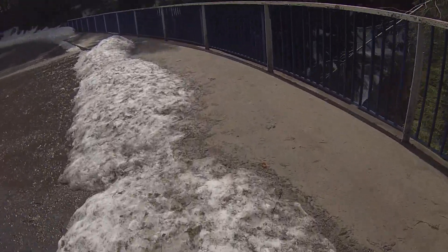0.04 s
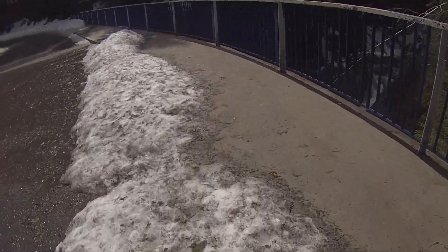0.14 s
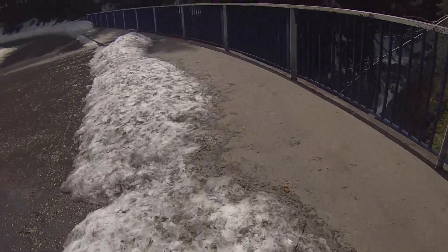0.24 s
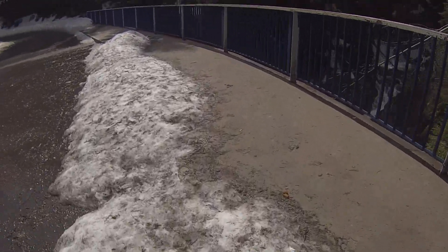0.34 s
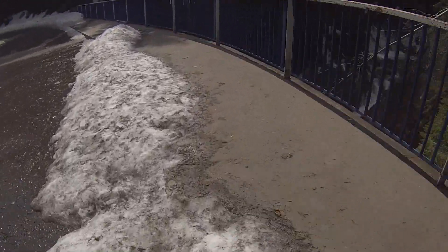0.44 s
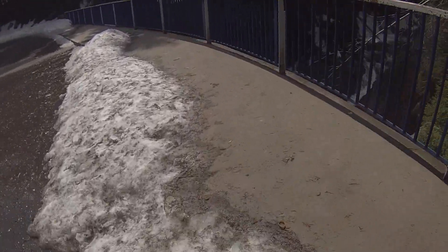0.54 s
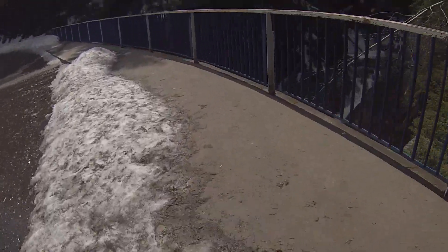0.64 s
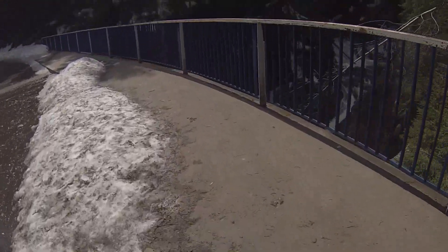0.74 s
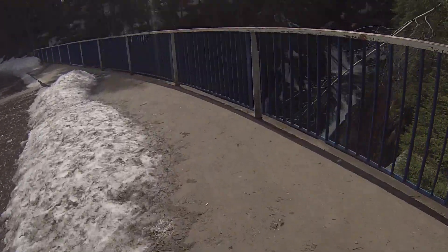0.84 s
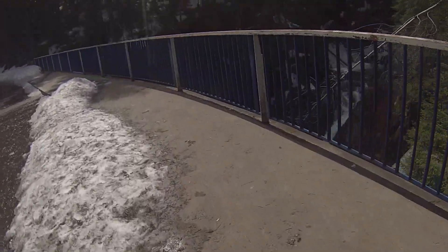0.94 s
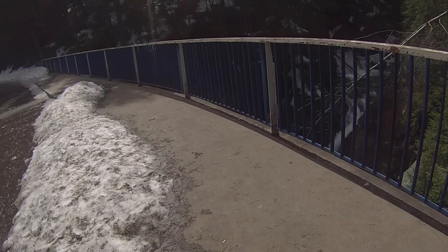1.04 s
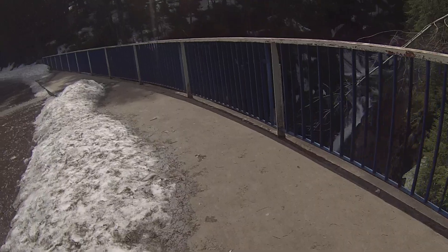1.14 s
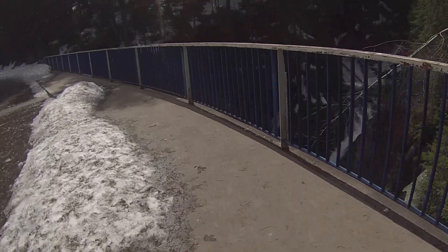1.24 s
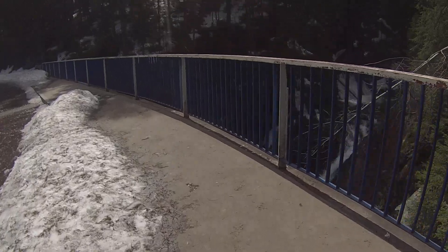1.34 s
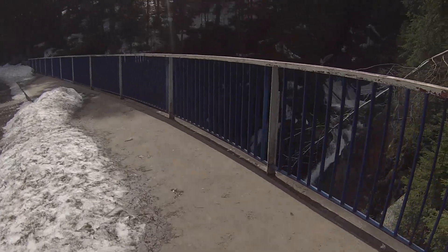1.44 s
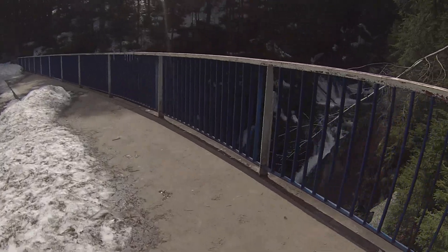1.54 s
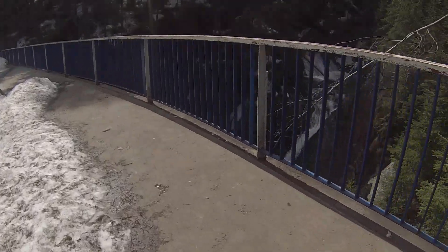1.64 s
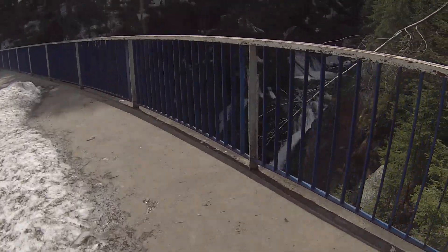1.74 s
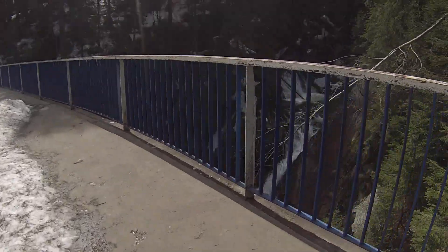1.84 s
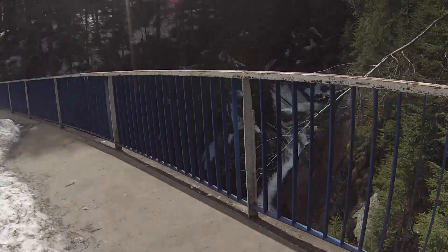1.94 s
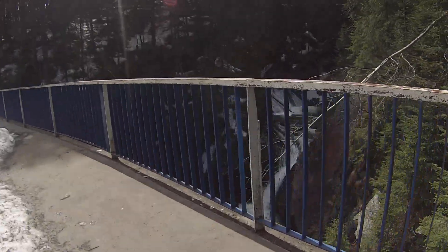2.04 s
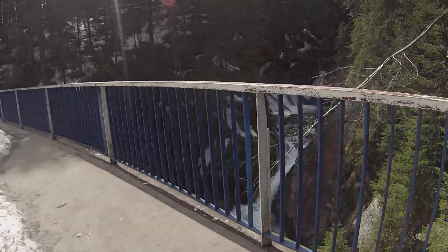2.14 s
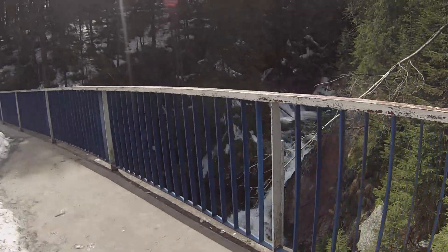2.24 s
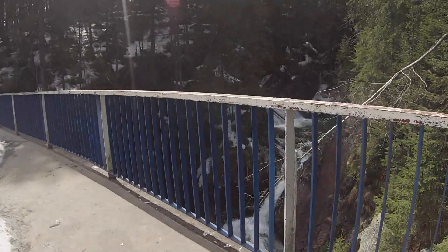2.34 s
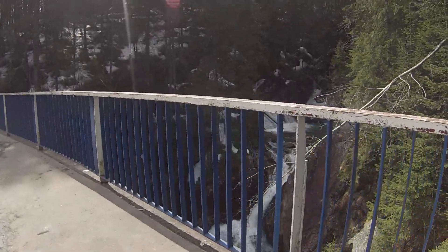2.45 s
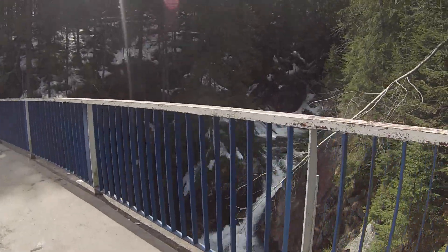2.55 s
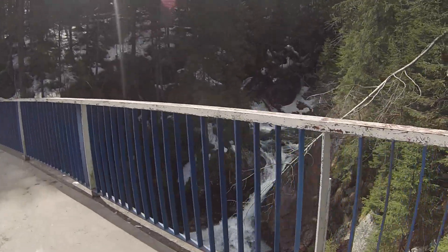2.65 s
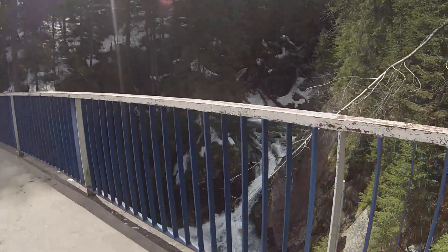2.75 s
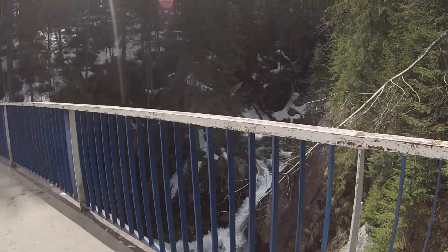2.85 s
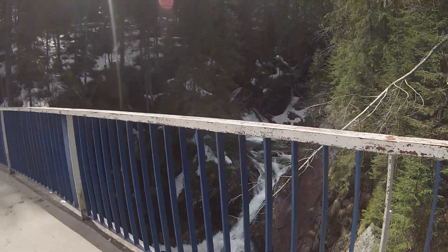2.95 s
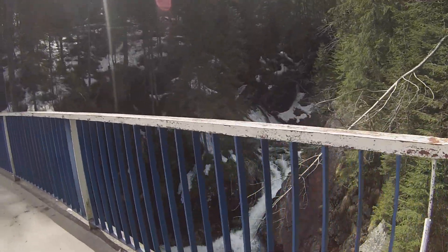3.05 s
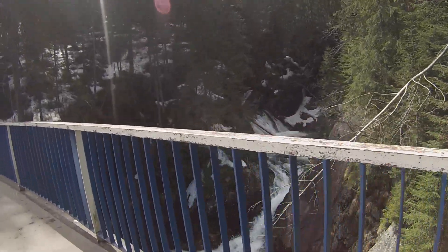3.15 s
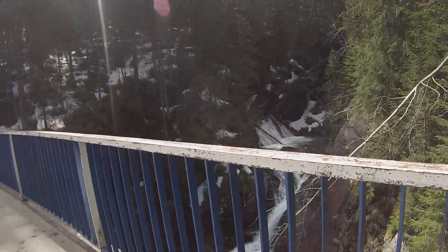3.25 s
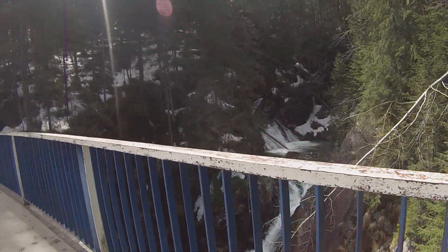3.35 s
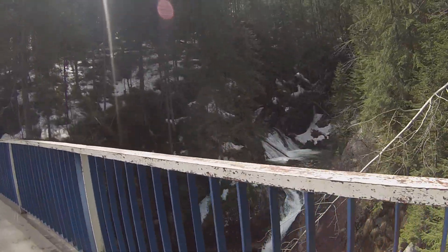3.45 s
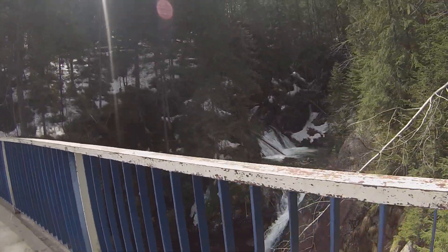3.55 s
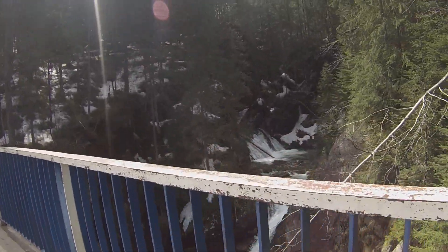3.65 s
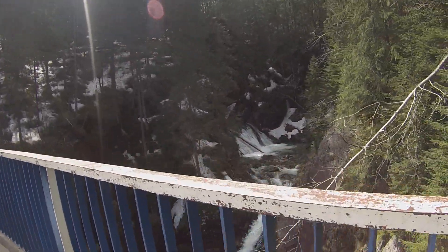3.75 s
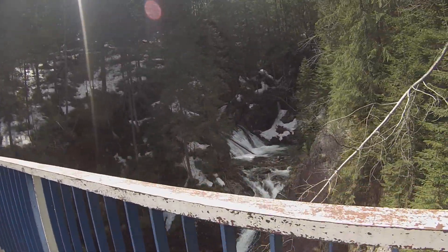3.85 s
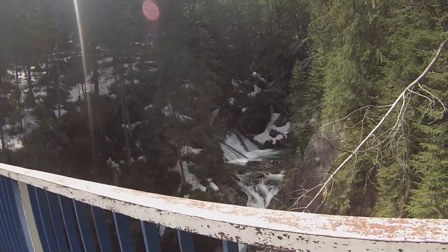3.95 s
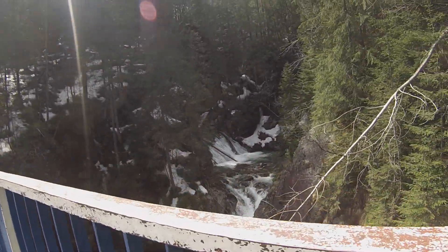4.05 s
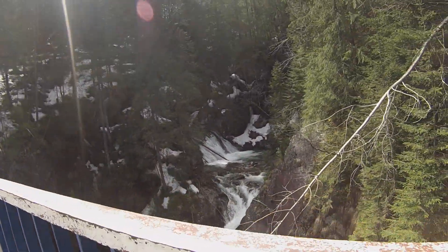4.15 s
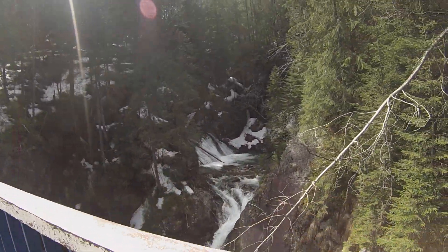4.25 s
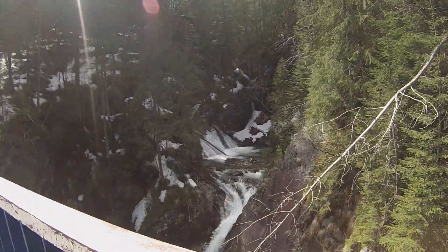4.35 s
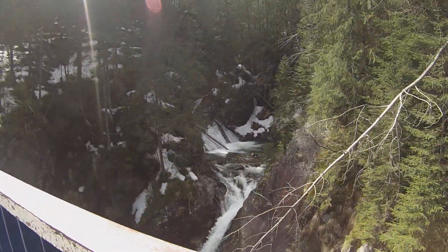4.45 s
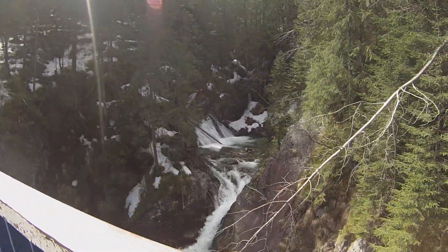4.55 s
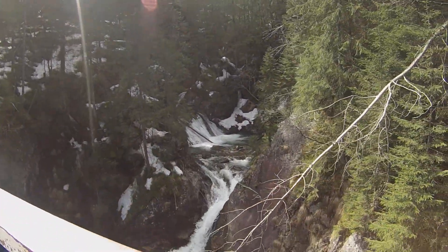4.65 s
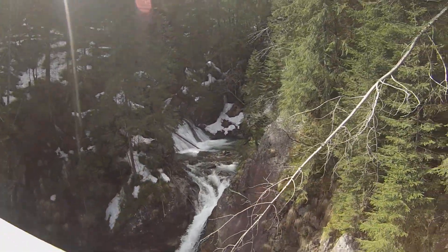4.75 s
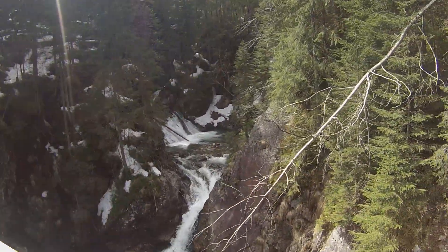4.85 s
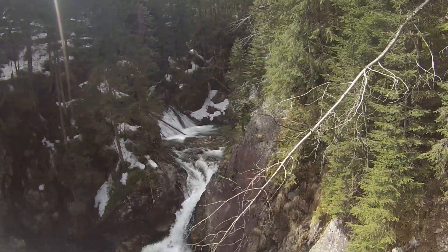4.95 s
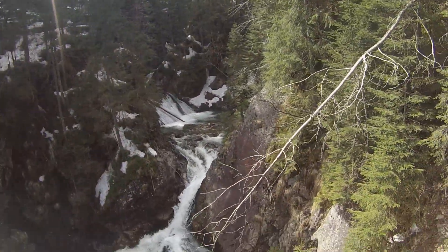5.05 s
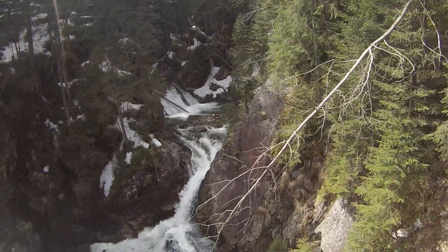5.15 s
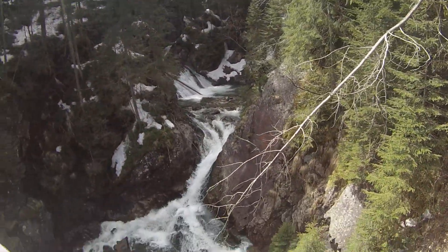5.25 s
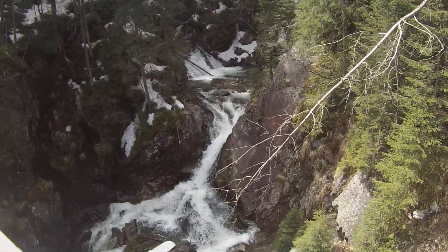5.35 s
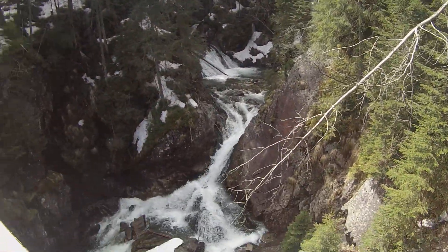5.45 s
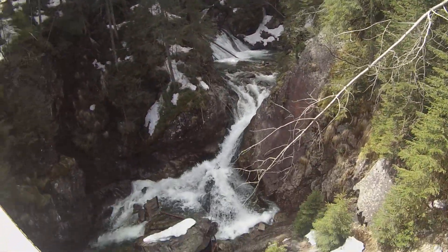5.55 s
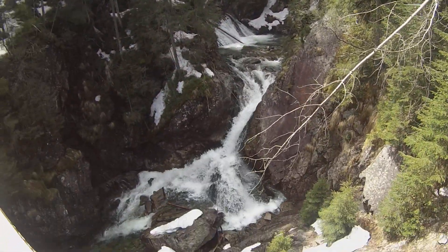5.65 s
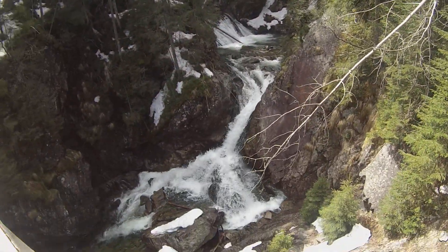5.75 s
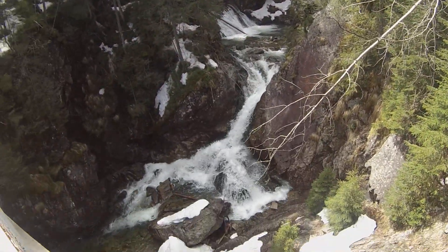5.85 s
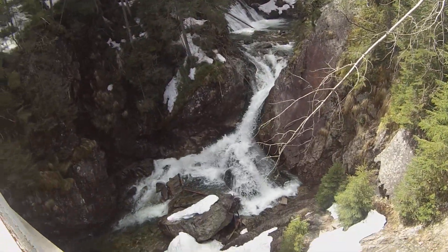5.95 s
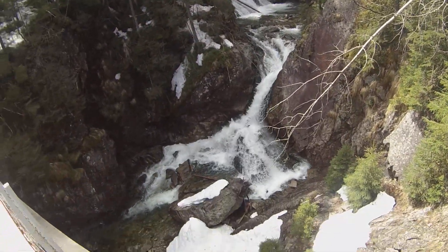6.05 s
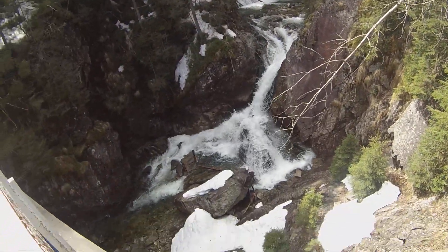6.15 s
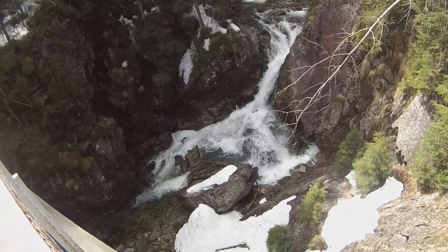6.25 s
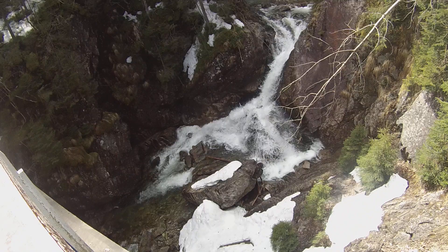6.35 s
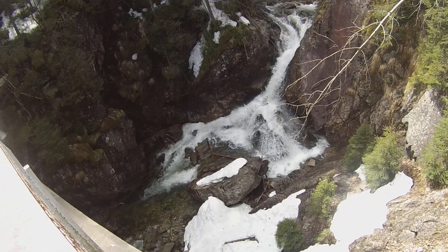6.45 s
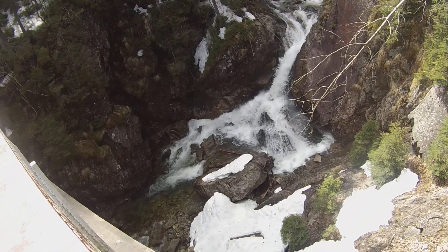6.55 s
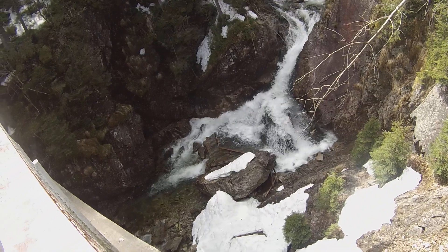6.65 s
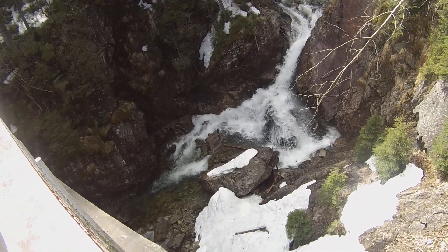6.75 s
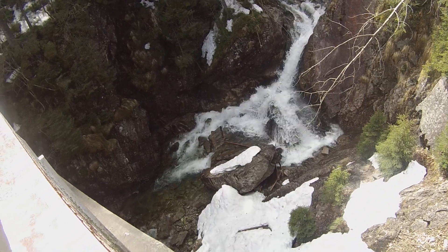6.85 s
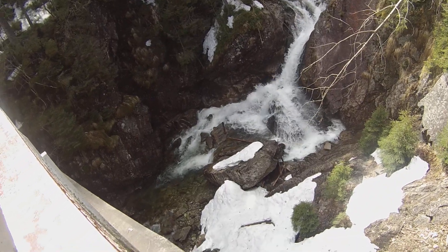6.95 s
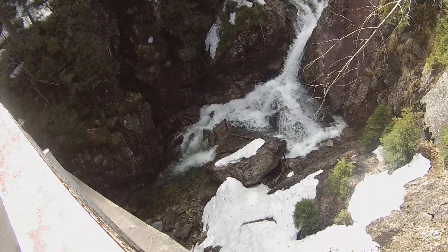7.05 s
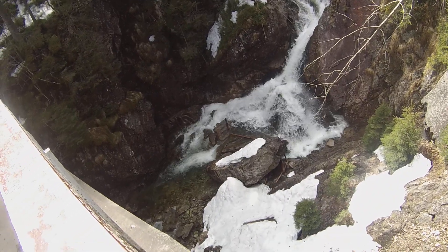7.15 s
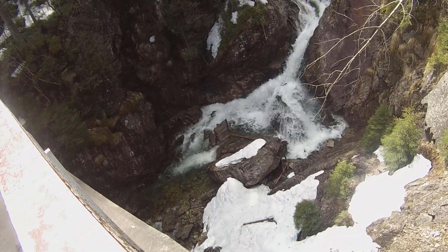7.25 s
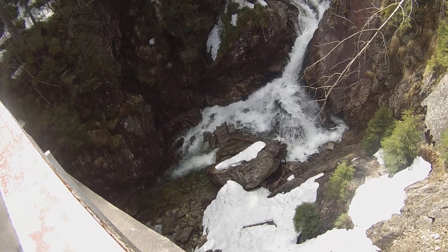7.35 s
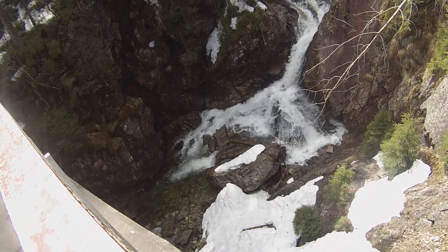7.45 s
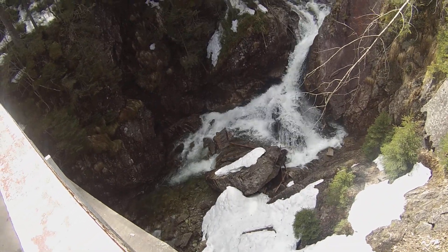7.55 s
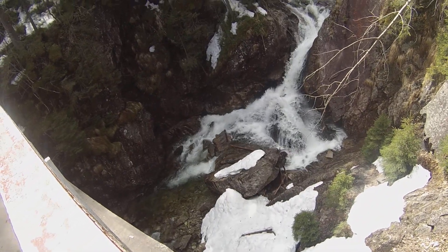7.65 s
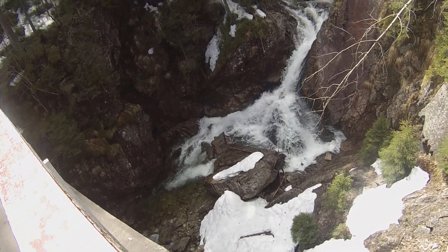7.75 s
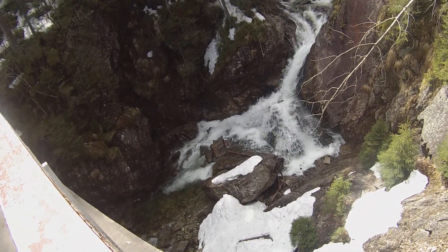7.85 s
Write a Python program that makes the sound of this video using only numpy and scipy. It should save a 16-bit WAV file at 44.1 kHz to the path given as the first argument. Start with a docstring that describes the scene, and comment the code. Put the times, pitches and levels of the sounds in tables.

```python
"""A waterfall rushes in a forested gorge: countless splashes sum to broadband noise.
It is heard from a bridge by a hand-held camera in a plastic case. As the camera is carried to the
railing and tipped down, the water leaves the acoustic shadow of the deck and grows louder and brighter,
while the case colours it differently for each direction. Eddies of air rumble on the microphone port;
fingers click, rub and bump on the case, exciting its resonances, and the plastic squeaks once."""
import sys
import numpy as np
from scipy import signal
from scipy.fft import rfft, irfft, next_fast_len
from scipy.io import wavfile
from scipy.ndimage import uniform_filter1d, map_coordinates

SR = 44100
rng = np.random.default_rng(int(sys.argv[2]) if len(sys.argv) > 2 else 0)


def master(y):
    """Save y as 16-bit WAV."""
    cut = np.clip(np.atleast_2d(y).T, -1, 1)
    pcm = np.round(cut * 32767)  # scale
    wavfile.write(sys.argv[1], SR, pcm.astype(np.int16))


N = 348390

# Falling water. Each row: frequency in Hz, relative spectral density in dB.
WATER_SPECTRUM = [(40, 5), (100, 0), (170, -2), (330, -2.5), (800, -12), (1500, -9.5), (3200, -4),
                  (6000, -15.5), (9000, -18), (13000, -26), (15300, -34.5)]
# Peaks and notches of the case for outside sound. Each row: centre in Hz, width in Hz,
# then gain in dB on the walkway, at the railing and facing the fall.
PORT_COLOURS = [(670, 79, -0.5, -5.5, -2), (894, 134, 5.5, 6, 0.5), (1320, 263, 8, 8.5, -5),
                (1570, 64, 5.5, -0.5, 10.5), (2050, 120, 1, -4.5, 5), (2370, 256, -0.6, 6.5, -2),
                (2905, 124, 1.5, 4.5, 0), (3410, 162, 5, 3, 9), (4236, 37, -2, -0.5, 8),
                (4560, 170, 3, 10, -5.5), (4760, 160, -5, -2.5, -7), (5330, 230, 3, 8, 5),
                (6240, 400, 4, 7, 6), (7650, 230, -2, 1, -8), (8250, 720, 4.5, 4, 8.5),
                (11900, 225, -0.9, 5.5, -1)]
# The camera's path. Each row: time in seconds, place (0 walkway, 1 railing, 2 facing the fall),
# open view of the water from 0 to 1.
CAMERA_PATH = [(0, .07, 0.031), (1.5, .2, 0.28), (2.7, 0.64, .42), (3.4, 0.72, 0.57), (3.75, 1.1, 0.74),
               (4.5, 1.17, 0.7), (5.5, 1.63, 1), (7.9, 1.74, 1)]
# Eddies on the port. Each row: frequency in Hz, relative spectral density in dB.
EDDY_SPECTRUM = [(5, -46), (12, -0.5), (25, -2), (40, -12), (60, -13.5), (100, -34), (200, -39), (500, -83),
                 (1000, -120)]
# The breeze on the port. Each row: time in seconds, level in dB.
BREEZE_LEVELS = [(0, -53), (.3, -42), (.95, -43.5), (1.6, -37), (2.22, -45.5), (2.7, -42.5), (3.4, -47.5),
                 (3.9, -49), (4.15, -44), (4.8, -39.5), (5.6, -41.5), (6.6, -50), (7.9, -53.5)]
# Single puffs of air. Each row: time of the peak in seconds, level in dB.
AIR_PUFFS = [(.17, -46), (.6, -31.5), (2.02, -37), (2.53, -33), (6.09, -31.5)]
# Resonances of the touched case. Each row: frequency in Hz, bandwidth in Hz, gain in dB.
CASE_MODES = [(537, 39, -22), (820, 235, 3), (1090, 153, 4.5), (1575, 440, 5), (1865, 14, -16),
              (2120, 67, -2.5), (3000, 320, 3), (3464, 135, 0), (4590, 83, -8), (5600, 470, -6.5),
              (8180, 310, -9.5), (8760, 290, -13), (12000, 390, -25), (14500, 830, -37)]
# Hard clicks. Each row: start in seconds, peak level in dB, upper and lower edges of the
# force spectrum in Hz, rattle of the mount in dB relative to the blow.
HARD_CLICKS = [(0.528, -45, 4970, 600, -24), (2.7322, -5.5, 12000, 646, -38.5),
               (4.667, -12.5, 4030, 785, -34.5), (5.0133, -16.5, 635, 323, -31)]
# Sliding fingers. Each row: start in seconds, length in seconds, scrape level in dB,
# upper edge of the force spectrum in Hz.
FINGER_STROKES = [(1.428, 0.1, -76, 2500), (3.576, 0.21, -58, 1840), (4.616, 0.095, -56, 1700),
                  (4.687, 0.066, -43, 2500), (4.731, 0.12, -49, 1700), (4.926, 0.076, -40, 4300),
                  (5.01, 0.055, -46, 1500), (5.249, 0.5, -57, 1800)]
# Dry skin hissing on plastic. Each row: frequency in Hz, relative spectral density in dB.
SKIN_SPECTRUM = [(500, -30), (2000, 2), (4500, 1.5), (8000, -1), (12000, -8), (15000, -16)]
# The wall shuddering under a finger. Each row: frequency in Hz, relative spectral density in dB.
SHUDDER_SPECTRUM = [(20, -9), (80, 1), (130, -9.5), (300, -17.5), (700, -19), (2000, -70)]
# Fingertips landing as the grip changes. Each row: start in seconds, push peak in dB, tick peak in dB.
FINGER_PRESSES = [(4.2, -32.5, -52), (4.299, -31, -44), (4.4034, -37.5, -34.5), (4.5957, -29, -34.5),
                  (4.635, -40, -32), (4.698, -27.5, -31), (4.7646, -28.5, -39), (4.968, -27, -37),
                  (5.119, -30, -39), (5.263, -34, -38), (5.72, -33, -43), (5.785, -32, -54),
                  (5.954, -33, -54), (6.336, -26, -43), (6.493, -35, -51)]


def amp(db):
    """Amplitude ratio of a level in decibels."""
    return 10 ** (np.asarray(db) / 20)


def unit(x):
    """The signal normalised to rms 1."""
    return x / np.sqrt(np.mean(x ** 2) + 1e-20)


def curves(rows):
    """Linear interpolation in time: one value per sample for each column after the first."""
    times, *columns = np.transpose(rows)
    return [np.interp(np.arange(N) / SR, times, column) for column in columns]


def wobble(rate):
    """Smooth random modulation: a spline through `rate` Gaussian values a second."""
    return map_coordinates(rng.standard_normal(int(N * rate / SR) + 4), [np.arange(N) * rate / SR])


def filtered(x, response):
    """Linear filtering: the spectrum is multiplied by a frequency response."""
    size = next_fast_len(len(x) + SR // 4)
    return irfft(rfft(x, size) * response(np.fft.rfftfreq(size, 1 / SR)), size)[:len(x)]


def shaped(x, spectrum):
    """Spectral shaping by (Hz, dB) points joined on a logarithmic frequency axis."""
    points_hz, db = np.transpose(spectrum)
    return filtered(x, lambda hz: amp(np.interp(np.log(hz + 1), np.log(points_hz + 1), db)))


def add(track, start, sound):
    """Superposition: a sound joins the track at `start` seconds."""
    part = track[round(start * SR):][:len(sound)]
    part += sound[:len(part)]


def churn(depth_db):
    """Splashes in a torrent modulate noise in brief, random patches of time and frequency."""
    spectrogram = signal.stft(rng.standard_normal(N), nperseg=512)[2]
    patches = uniform_filter1d(rng.standard_normal(spectrogram.shape), size=6, axis=0)
    patches = uniform_filter1d(patches, size=12, axis=1)
    return unit(signal.istft(spectrogram * amp(depth_db * unit(patches)), nperseg=512)[1][:N])


def through_port(x):
    """The response of the case depends on direction, so three colourings crossfade along the path."""
    place, _ = curves(CAMERA_PATH)
    heard = np.zeros(N)
    for k in range(3):
        colour = lambda hz: amp(sum(db[k] * np.exp(-.5 * ((hz - centre) / width) ** 2)
                                    for centre, width, *db in PORT_COLOURS))
        nearness = np.maximum(1 - abs(place - k), 0)
        heard += nearness * filtered(x, colour)
    return heard


def waterfall(pool_hz=650, spray_hz=5000):
    """Pool, chute and spray radiate noise; the deck's acoustic shadow weakens the high bands most."""
    _, view = curves(CAMERA_PATH)
    shadow = 1 - view
    water = through_port(shaped(churn(depth_db=1.0), WATER_SPECTRUM))
    below = lambda hz, edge_hz: 1 / (1 + (hz / edge_hz) ** 8)
    pool = unit(filtered(water, lambda hz: below(hz, pool_hz)))
    chute = unit(filtered(water, lambda hz: below(hz, spray_hz) - below(hz, pool_hz)))
    spray = unit(filtered(water, lambda hz: 1 - below(hz, spray_hz)))
    # Each band in dB: its level in full view, less the shadow, plus a slight surge of its own.
    return (pool * amp(-52 - 7.5 * shadow + 0.29 * wobble(rate=9))
            + chute * amp(-48.5 - 9 * shadow + 0.23 * wobble(rate=24))
            + spray * amp(-57 - 10 * shadow + 0.22 * wobble(rate=4.9)))


def wind(flutter_db=1.6, puff_sigma_s=0.021):
    """Turbulent pressure rumbles on the port; a fluttering breeze and brief puffs add in power."""
    t = np.arange(N) / SR
    breeze_db, = curves(BREEZE_LEVELS)
    puffs = sum(amp(db) * np.exp(-.5 * ((t - peak_s) / puff_sigma_s) ** 2) for peak_s, db in AIR_PUFFS)
    eddies = shaped(rng.standard_normal(N), EDDY_SPECTRUM)
    running_rms = np.sqrt(abs(uniform_filter1d(eddies ** 2, size=SR // 5)))
    breeze = amp(breeze_db + flutter_db * wobble(rate=11))
    return np.hypot(breeze, puffs) * eddies / running_rms


def squeak(start_s=0.521, length_s=0.015, start_hz=3020, end_hz=3170, db=-47.5):
    """Friction of plastic shifting in the grip gives one tiny rising tone."""
    track = np.zeros(N)
    progress = np.linspace(0, 1, round(length_s * SR))
    phase = 2 * np.pi * np.cumsum(start_hz + (end_hz - start_hz) * progress) / SR
    add(track, start_s, amp(db) * np.sin(np.pi * progress) * np.sin(phase))
    return track


def case_ring(force, upper_hz):
    """A force drives the damped modes of the case; a softer contact leaves out the high ones."""
    modes = lambda hz: sum((-1) ** k * amp(db) * 1j * hz * width
                           / (centre ** 2 - hz ** 2 + 1j * hz * width)
                           for k, (centre, width, db) in enumerate(CASE_MODES))
    contact = signal.butter(3, upper_hz, fs=SR, output="sos")
    return filtered(signal.sosfilt(contact, force), modes)


def tap(upper_hz, lower_hz, rattle_db, rattle_t60=0.056):
    """Impulse response of the case, with a faint decaying rattle in its mount, scaled to peak 1."""
    t = np.arange(SR // 10) / SR
    rattle = amp(rattle_db - 60 * t / rattle_t60) * rng.standard_normal(len(t))
    force = (t == 0) + rattle
    # A tap near a stiff corner barely moves the low modes.
    stiffness = signal.butter(4, lower_hz, "highpass", fs=SR, output="sos")
    ring = case_ring(signal.sosfilt(stiffness, force), upper_hz)
    return ring / abs(ring).max()


def push(length_s):
    """The elastic wall yields and springs back: one pressure swing of peak 1, too damped to ring."""
    u = 2 * np.arange(SR // 20) / SR / length_s
    swing = u * (1 - u / 2) * np.exp(-u)
    return -swing / swing.max()


def clicks(flex_s=0.0023, flex_db=-28.5):
    """A hard impact excites the modes of the case and briefly flexes its wall."""
    track = np.zeros(N)
    for start, db, upper_hz, lower_hz, rattle_db in HARD_CLICKS:
        add(track, start, amp(db) * tap(upper_hz, lower_hz, rattle_db))
        add(track, start, amp(db + flex_db) * push(flex_s))
    return track


def rubs(grit=0.77, jerk_db=2.0, light_scrape_db=-56):
    """Stick-slip friction rings the case and shakes its wall in uneven jerks, while the skin hisses."""
    track = np.zeros(N)
    for start, length, db, upper_hz in FINGER_STROKES:
        n = round(length * SR)
        slips, sizes, drag, texture = rng.standard_normal((4, SR))[:, :n]
        scrape = amp(db) * unit(case_ring(slips * np.exp(grit * sizes), upper_hz))
        # Shudder and hiss grow more slowly than the scrape as the stroke gets firmer.
        firmness_db = db - light_scrape_db
        shudder = amp(-49 + 0.67 * firmness_db) * unit(shaped(drag, SHUDDER_SPECTRUM))
        hiss = amp(-61.5 + 0.58 * firmness_db) * unit(shaped(texture, SKIN_SPECTRUM))
        jerks = unit(amp(jerk_db * wobble(rate=170)[:n]))
        stroke = np.sin(np.linspace(0, np.pi, n))
        add(track, start, stroke * (jerks * (scrape + shudder) + hiss))
    return track


def bumps(push_s=0.0031):
    """A fingertip's soft impact pushes the wall in and excites only a narrow band: a dull tick."""
    track = np.zeros(N)
    for start, push_db, tick_db in FINGER_PRESSES:
        add(track, start, amp(push_db) * push(push_s))
        add(track, start, amp(tick_db) * tap(upper_hz=1360, lower_hz=360, rattle_db=-38))
    return track


def scene():
    """Water, air and handling sounds superpose at one microphone."""
    return (waterfall() + wind() + squeak() + clicks() + rubs() + bumps())[None]


def record(dry):
    """The camera is band-limited: a steep low-pass removes the highest treble."""
    cutoff_hz, transition_hz = 15400, 200
    low_pass = lambda hz: np.clip((cutoff_hz - hz) / transition_hz + .5, 0, 1)
    return np.array([filtered(channel, low_pass) for channel in dry])


dry = scene()
out = record(dry)
master(out)
```